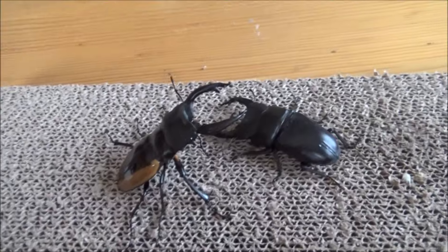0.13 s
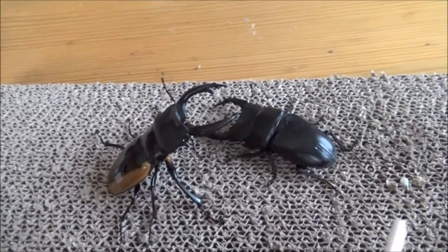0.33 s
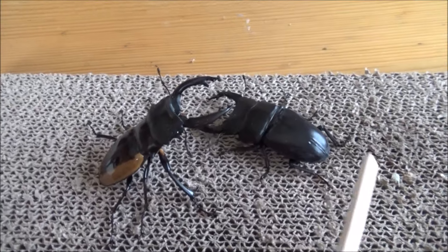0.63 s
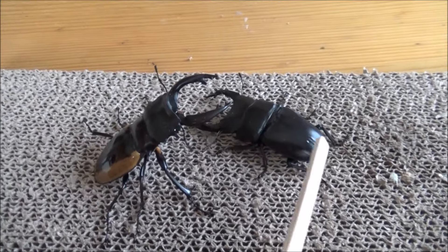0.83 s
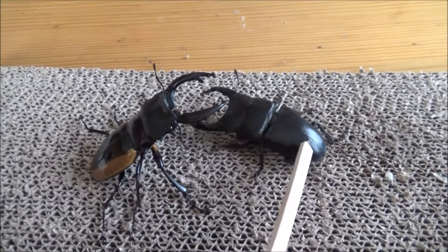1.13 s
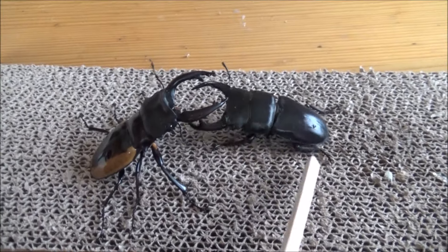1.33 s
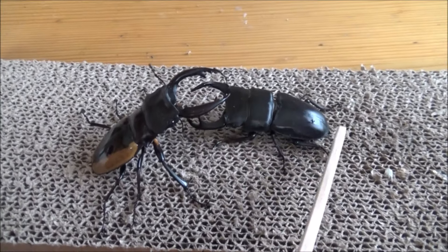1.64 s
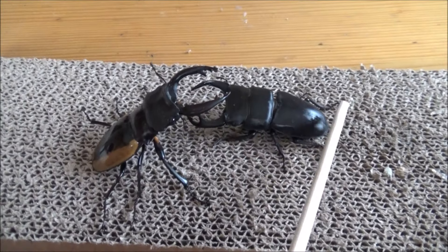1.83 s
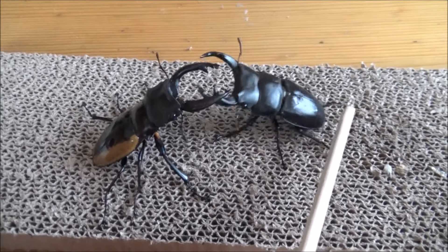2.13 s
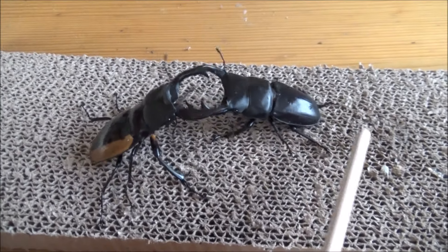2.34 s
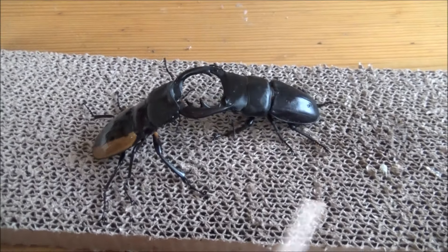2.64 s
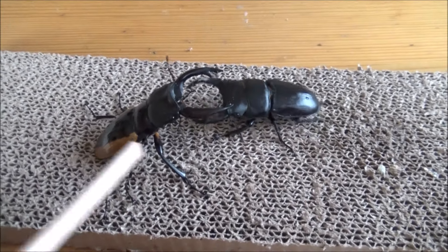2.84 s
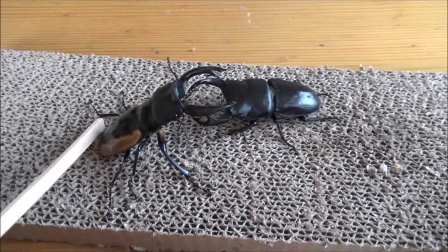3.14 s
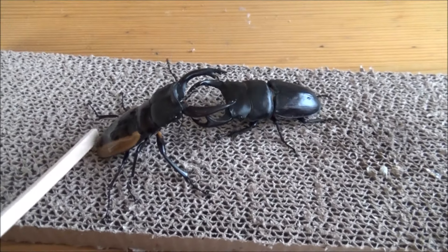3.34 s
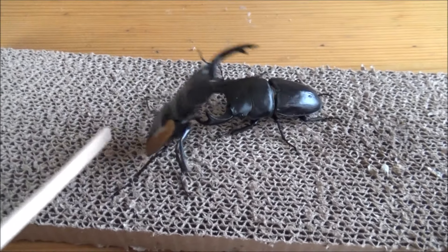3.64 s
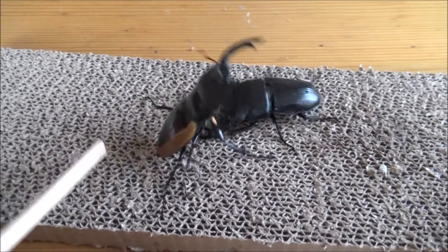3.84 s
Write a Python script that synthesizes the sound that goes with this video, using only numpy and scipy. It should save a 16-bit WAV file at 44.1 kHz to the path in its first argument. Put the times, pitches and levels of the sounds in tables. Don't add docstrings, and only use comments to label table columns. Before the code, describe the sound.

Beetle claws scratching on a rough mesh mat, heard close in a quiet room. After a tiny start tick at 0.07 s, only low hum and a very faint rub. Light ticks and scrapes come at 1.05-1.4 s, sharper cracks and soft board thumps at 1.9-2.4 s. A stick hisses through fingers until 2.85 s; faint scratches near 3.1 s, then a loud, dense crackling flurry from 3.43 s to the end.

```python
import sys
import numpy as np
from scipy import signal
from scipy.fft import rfft, irfft, next_fast_len
from scipy.io import wavfile
from scipy.ndimage import uniform_filter1d

SR = 44100
rng = np.random.default_rng(int(sys.argv[2]) if len(sys.argv) > 2 else 0)


def int16_out(signal):
    q = np.round(np.clip(np.atleast_2d(signal).T, -1, 1) * 32767)
    wavfile.write(sys.argv[1], SR, q.astype(np.int16))


def boost_factor(decibels):
    exponent = np.asarray(decibels, float) / 20
    return 10 ** exponent


N = 176400

# t/s, peak level/dB, claw ring f/Hz, level of the mesh knock under it/dB
SNAPS = [(1.0594, -40, 11800, -24), (1.107, -37.5, 10300, -11), (1.2735, -38, 15000, -10),
         (1.2928, -35, 14100, -13), (1.3777, -36, 15300, -18), (1.899, -33.5, 11000, -8),
         (1.9312, -30, 13000, -25), (1.9595, -28, 15200, -32), (2.1498, -27, 11700, -13),
         (2.191, -16, 13900, -18.5), (2.355, -25.5, 12500, -25), (3.0575, -28, 11000, -3.5),
         (3.3238, -40.5, 11800, -3.5),
         (3.48, -19, 12500, -14), (3.564, -35.5, 6500, 1.5), (3.583, -34, 13300, -14),
              (3.6508, -18, 12500, -15), (3.6614, -23, 10200, -15), (3.693, -36, 11000, 5.5),
              (3.7166, -34, 11900, -2), (3.751, -8.5, 11000, -20), (3.771, -17, 9800, -37),
              (3.8741, -29, 12000, -16), (3.9376, -20, 14400, -23), (3.9556, -32, 9090, -20)]
# t/s, peak level/dB, claw ring f/Hz, mesh level/dB
CRACKS = [
    (1.1695, -28, 9000, -6),
    (2.0862, -11, 11300, -22),
    (3.471, -14, 11800, -14),
    (3.4905, -16.5, 12000, -5),
    (3.5202, -16.5, 7500, -20),
    (3.75, -10, 11000, -25),
    (3.8525, -10.5, 7500, -17),
    (3.8867, -23, 9450, -10.5),
    (3.9307, -20, 8150, -13.5),
    (3.9601, -14.5, 10900, -13.5),
]
# t/s, peak level/dB, ring f/Hz
PLUCKS = [(1.128, -41, 12500), (1.149, -33, 12500), (1.186, -41, 7500), (1.191, -45, 11600),
          (1.232, -49, 11000), (1.268, -46, 11500), (1.559, -43, 12000), (1.968, -32, 15000),
          (2.004, -40, 8500), (2.015, -40, 14000), (2.096, -36, 10500), (2.138, -32, 13000),
          (2.143, -31, 12400), (2.163, -38, 14000), (2.171, -28, 12900), (2.183, -42, 12000),
          (2.198, -38, 12000), (2.204, -32, 12500), (2.232, -40, 12000), (2.266, -42, 12500),
          (2.547, -37, 11500), (3.436, -42, 12000), (3.444, -42, 13500), (3.496, -32, 11000),
          (3.516, -22, 13500), (3.5593, -31, 11500), (3.595, -38, 13000), (3.602, -34, 12500),
          (3.617, -27, 13400), (3.628, -36, 7000), (3.64, -35, 13500), (3.735, -36, 11000),
          (3.74, -28, 13000), (3.743, -24, 14000), (3.7442, -35, 6960), (3.763, -32, 13500),
          (3.822, -29, 10000), (3.847, -28, 12000), (3.898, -40, 8000), (3.927, -32, 12000),
          (3.9642, -30, 9000), (3.992, -32, 9000)]
# f/Hz, width/Hz, level/dB
MESH = [(660, 275, -1.5), (1665, 320, 2.5), (3400, 2300, -0.5), (5600, 4640, -4)]

# t/s, length/s, level/dB, bright centre f/Hz, dull mesh level/dB
SCRAPES = [(1.182, 0.015, -53.5, 11000, 0.5), (1.228, 0.07, -59.5, 12500, 1),
           (1.898, 0.037, -52.5, 12000, 0.5), (1.945, 0.09, -53.5, 13000, 4),
           (2.079, 0.006, -40.5, 11700, 5), (2.088, 0.041, -61, 11000, 5), (2.136, 0.068, -52.5, 12500, 0),
           (2.192, 0.02, -45, 12500, -4), (2.225, 0.047, -58, 12000, 4), (2.35, 0.011, -64, 11600, 20.5),
           (3.468, 0.015, -37.5, 12500, 4), (3.489, 0.017, -38.5, 12500, 1), (3.512, 0.02, -49, 11000, 4),
           (3.572, 0.0039, -30, 12500, -12), (3.482, 0.53, -53.5, 12200, 2.5),
           (3.17, 0.035, -59, 4500, -15), (3.122, 0.056, -58.5, 9000, 4.5)]
# t/s, length/s, level/dB, bright centre f/Hz, mesh level/dB
DRAGS = [
    (1.12, 0.046, -51, 11000, -3.5),
    (3.04, 0.02, -57.5, 11000, 6),
    (3.165, .038, -56.5, 12400, -22),
    (3.432, 0.039, -47, 12500, 2.5),
    (3.606, 0.016, -41.5, 13500, -4),
    (3.733, 0.015, -49, 13000, 3),
    (3.806, 0.042, -42.5, 12500, 2),
    (3.923, 0.011, -43.5, 11000, 3),
    (3.9955, 0.016, -33.5, 11000, 3.5),
]
# t/s, length/s, level/dB, f/Hz, mesh level/dB
CHATTERS = [
    (3.768, 0.02, -28.5, 10940, -22),
    (3.769, 0.021, -40.5, 5200, -18),
    (3.2, 0.042, -60, 4300, -20),
]

# t/s, peak level/dB, f/Hz
KNOCKS = [(1.899, -36.5, 1560), (2.08, -36, 4000), (3.769, -26.5, 4900), (2.386, -42, 3400),
          (3.127, -38, 2000), (3.05, -40, 4500), (3.176, -38.5, 3020), (3.469, -40, 1830),
          (3.515, -24.5, 3500), (3.693, -27, 3020), (3.815, -33, 1623), (1.343, -47, 3500),
          (1.349, -51, 4500), (2.023, -40, 4160), (2.164, -46, 3800), (2.195, -40, 1850),
          (2.234, -44.5, 4000), (3.453, -29, 5730), (3.474, -27, 3970), (3.48, -29, 900),
          (3.932, -25, 3800), (3.996, -25.5, 3430)]
# t/s, peak level/dB, favoured f/Hz
THUMPS = [(1.626, -36.5, 314), (1.636, -39, 440), (2.031, -31.5, 207), (2.043, -35, 302),
          (2.088, -30.5, 216), (2.109, -32.5, 217), (2.147, -34.5, 286), (2.258, -40.5, 223),
          (2.356, -37.5, 219), (2.517, -38.5, 236), (3.054, -35, 278), (3.47, -30.5, 255),
          (3.4842, -21, 275), (3.564, -28.5, 248), (3.571, -28, 250), (3.624, -32.5, 275),
          (3.737, -34, 238), (3.767, -34, 228), (3.847, -36.5, 278), (3.935, -34.5, 254)]
# f/Hz, level/dB, t60/s
BOARD = [(178.5, -0.5, 0.1), (219, 1, 0.15), (268.8, 1.5, 0.15), (332, 0.5, 0.14), (456.6, 4.5, 0.095),
         (713, 4, 0.028), (1008, 4, 0.027)]

# t/s, length/s, level/dB, fade-in share of the length
SLIDES = [
    (0.172, 0.16, -57.5, 0.23),
    (1.936, 0.087, -50, 0.18),
    (2.463, 0.4, -49.5, 0.4),
    (2.547, 0.063, -45, 0.72),
]
# f/Hz, width/Hz, level/dB
SLIDE_COLOURS = [
    [(6000, 450, 1), (10000, 600, -5), (11000, 700, -7), (13000, 1200, -6)],
    [(6070, 550, 0), (7500, 3500, -6)],
    [(2750, 2500, 4), (8900, 2400, 8), (12500, 3800, 7.5)],
    [(12000, 3200, 3)],
]

# f/Hz, level/dB, t60/s
HOUSING = [(773, -4, 0.05), (900, 0.5, 0.045), (1425, 1, 0.024), (2620, -6, 0.03), (4650, -11, .012),
           (1190, -9, .02)]
# f/Hz, level per Hz/dB
ROOM = [(30, -17), (95, -8.5), (150, -7), (280, -2.5), (800, -11), (2200, -21), (7000, -27), (15500, -31)]
# f/Hz, width/Hz, lift/dB
ROOM_TONES = [(96.6, 23.5, 10), (128, 12, -1.5), (211, 99, 5.5), (286, 16.5, 4.5), (410, 23, 2),
              (480, 15, 7.5), (1005.4, 69, 10), (1478, 170, 5)]
# f/Hz, correlation (1 = the same)
ALIKE = [(60, 1), (200, 0.99), (400, 0.98), (1000, 0.94), (2400, 1), (4400, 0.99), (7000, 0.9), (14000, 1)]
# t/s, level/dB
GAIN = [(.07, -6.5), (.6, -5.5), (1.2, -3), (1.9, -1), (2.2, 0.5), (4, 0.5)]
# f/Hz, left over right level/dB
LEAN = [(30, .4), (70, 2), (200, 1.8), (700, 0)]

OPEN_S = 0.0686
CLAW_WIDTH, THREAD_WIDTH = 0.42, 0.22


def unit(x):
    return x / np.sqrt(np.mean(x ** 2) + 1e-20)


def along(points, hz):
    f, value = np.transpose(points)
    return np.interp(np.log(hz + 1), np.log(f + 1), value)


def filtered(x, response):
    n = x.shape[-1]
    padded = next_fast_len(n + 8192)
    spectrum = rfft(x, padded) * response(np.fft.rfftfreq(padded, 1 / SR))
    return irfft(spectrum, padded)[..., :n]


def body(peaks):
    def response(f):
        total = 0
        for k, (centre, width, db) in enumerate(peaks):
            damping = 1j * f * width
            total = total + (-1) ** k * boost_factor(db) * damping / (centre * centre - f * f + damping)
        return total
    return response


def add(track, s, sound):
    part = track[round(s * SR):][:len(sound)]
    part += sound[:len(part)]


def patchy(x, patchy_db, size, steps):
    z = signal.stft(x, nperseg=size)[2]
    field = rng.standard_normal(z.shape[-2:])
    for axis in (0, 1):
        field = uniform_filter1d(field, size=steps, axis=axis)
    return signal.istft(z * boost_factor(patchy_db * unit(field)), nperseg=size)[1][..., :N]


def contact(force, claw_hz, mesh_db, width=CLAW_WIDTH):
    narrow = body([(claw_hz, width * claw_hz, 0)])
    broad = body([(claw_hz, claw_hz, 0)])
    claw = unit(filtered(force, lambda f: narrow(f) * broad(f)))
    mesh = unit(filtered(force, body(MESH)))
    return claw + boost_factor(mesh_db) * mesh


def snaps():
    out, t = np.zeros(N), np.arange(SR // 50) / SR
    plucks = [(*row, -20) for row in PLUCKS]
    kinds = [(SNAPS, -11, CLAW_WIDTH),  # rows, fizz under jolt in dB, ring width
             (CRACKS, -21, CLAW_WIDTH),
             (plucks, -6, THREAD_WIDTH)]
    fizz_t60_s, knock_db = 0.007, 6.5
    for rows, fizz_db, width in kinds:
        for s, db, hz, mesh_db in rows:
            force = boost_factor(fizz_db - 60 * t / fizz_t60_s) * rng.standard_normal(len(t))
            force[0] = 1
            snap = contact(force, hz, mesh_db + knock_db, width)
            claw_peak = np.abs(contact(force, hz, -99, width)).max()
            add(out, s, boost_factor(db) * snap / claw_peak)
    return out


def catches(count):
    grains_per_s, spread_db, rarest, clump_db = 9000, 2, 0.03, 2.5
    chance, luck, third = rng.random((3, count))
    clumps_db = clump_db * unit(uniform_filter1d(third - 0.5, size=260))
    strength = boost_factor(clumps_db - spread_db * np.log(np.maximum(luck, rarest)))
    return (chance < grains_per_s / SR) * np.sign(third - 0.5) * strength


def scrapes():
    out, edge_s = np.zeros(N), 0.0099
    kinds = [(SCRAPES, 4.5, 0.88, CLAW_WIDTH),  # rows, slope in dB, release share of length, ring width
             (DRAGS, 8, 0, CLAW_WIDTH),
             (CHATTERS, 0, 0, THREAD_WIDTH)]
    for rows, slope_db, release, width in kinds:
        for s, length, db, hz, mesh_db in rows:
            count = min(SR // 2, int(2 * length * SR) + SR // 50)
            t = np.arange(count) / SR
            rise = 2 * t / edge_s
            fall = (length - t) / max(edge_s, release * length)
            stroke = np.clip(np.minimum(rise, fall) + 0.5, 0, 1)
            stroke = stroke * boost_factor(slope_db * (np.minimum(t / length, 1) - 0.5))
            add(out, s, boost_factor(db) * stroke * contact(catches(count), hz, mesh_db, width))
    return patchy(out, 1.5, size=128, steps=4)


def knocks():
    out, t = np.zeros(N), np.arange(SR // 20) / SR
    width, t60_s = 0.6, 0.015
    for s, db, hz in KNOCKS:
        push = boost_factor(-60 * t / t60_s) * rng.standard_normal(len(t))
        ring = body([(hz, width * hz, 0)])
        knock = filtered(push, lambda f: ring(f) ** 2)
        add(out, s, boost_factor(db) * knock / np.abs(knock).max())
    return out


def thumps():
    out, t = np.zeros(N), np.arange(SR // 3) / SR
    push_s, favour_hz = 0.0023, 32
    for s, db, favoured_hz in THUMPS:
        luck_db = rng.normal(0, 0.97, len(BOARD))
        ring = 0
        for (hz, level, t60), luck in zip(BOARD, luck_db):
            favour = 1 / 8 + 1 / (1 + ((hz - favoured_hz) / favour_hz) ** 2)
            ring = ring + favour * boost_factor(level + luck - 60 * t / t60) * np.sin(2 * np.pi * hz * t)
        add(out, s, boost_factor(db) * ring * (1 - np.exp(-t / push_s)))
    return out


def slides():
    out, t = np.zeros(N), np.arange(SR // 2) / SR
    for (s, length, db, fade), colour in zip(SLIDES, SLIDE_COLOURS):
        rise = t / (fade * length)
        fall = (length - t) / ((1 - fade) * length)
        swell = np.clip(np.minimum(rise, fall), 0, 1) ** 0.84
        hiss = unit(filtered(rng.standard_normal(len(t)), body(colour)))
        add(out, s, boost_factor(db) * swell * hiss)
    return out


def start_tick():
    out, t = np.zeros(N), np.arange(SR // 80) / SR
    ring = sum(boost_factor(db - 60 * t / min(t60, 0.04)) * np.sin(2 * np.pi * hz * t) for hz, db, t60 in HOUSING)
    crack = boost_factor(-25.5 - 60 * t / 0.0061) * rng.standard_normal(len(t))
    add(out, OPEN_S + 0.0011, boost_factor(-35.5) * ring + crack)
    return out


def walls(x):
    t, t60_s = np.arange(SR // 5) / SR, 0.082
    tail = rng.standard_normal((2, len(t))) * boost_factor(-60 * t / t60_s)
    tail = tail / np.linalg.norm(tail[0])
    return boost_factor(-19.5) * signal.fftconvolve(x[None], tail, axes=1)[:, :N]


def room():
    def spread(f):
        level_db = along(ROOM, f)
        for centre, width, db in ROOM_TONES:
            level_db = level_db + db / (1 + (2 * (f - centre) / width) ** 2)
        turn = np.arccos(np.clip(along(ALIKE, f), -1, 1)) / 2
        return boost_factor(level_db) * [np.cos(turn), np.sin(turn)]
    noise = patchy(rng.standard_normal((2, N)), 1, size=512, steps=7)
    mid, side = filtered(noise, spread)
    return boost_factor(-45.5) * unit(np.array([mid + side, mid - side]))


def scene():
    near = snaps() + scrapes() + knocks() + thumps() + slides()
    gain = boost_factor(np.interp(np.arange(N) / SR, *np.transpose(GAIN)))
    return near + walls(near) + start_tick() + gain * room()


def low_pass(x):
    return signal.sosfilt(signal.butter(12, 17020, fs=SR, output="sos"), x)


def record(dry):
    top_hz, edge_hz, bass_cut_hz = 15900, 16800, 42

    def microphones(f):
        lean = boost_factor(along(LEAN, f) / 2 * np.array([[1], [-1]]))
        return lean * (f < top_hz) * (1j * f / (bass_cut_hz + 1j * f))
    wet = filtered(dry, microphones)
    top = filtered(dry, lambda f: (f >= top_hz) * (f < edge_hz))
    loud = uniform_filter1d(np.abs(top), size=400) > boost_factor(-46)
    top_gate = uniform_filter1d(1.0 * loud, size=200)
    is_open = np.arange(N) >= OPEN_S * SR
    return low_pass((wet + 0.5 * top_gate * top) * is_open)


dry = scene()
out = record(dry)
int16_out(out)
```